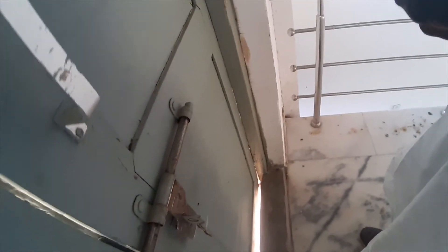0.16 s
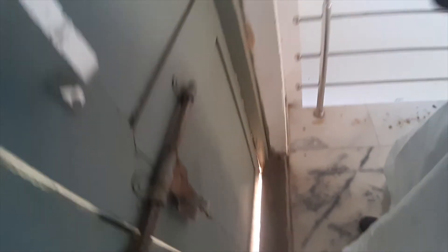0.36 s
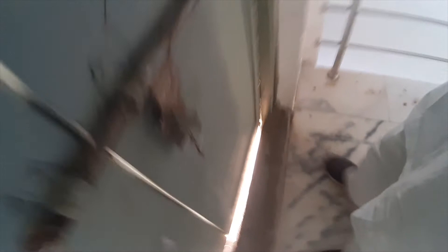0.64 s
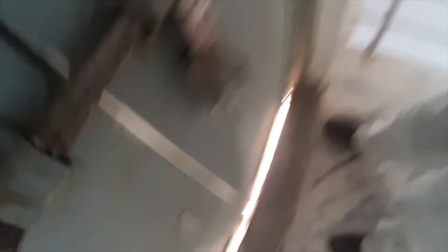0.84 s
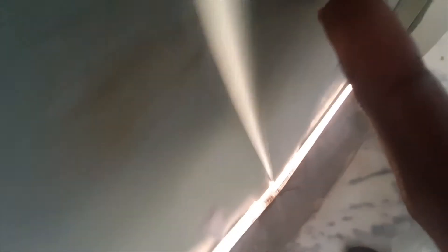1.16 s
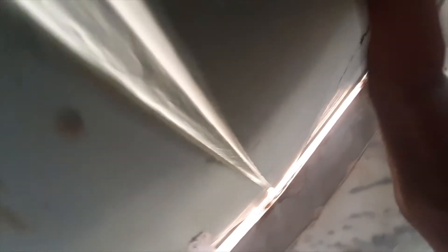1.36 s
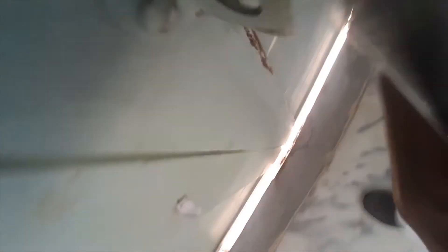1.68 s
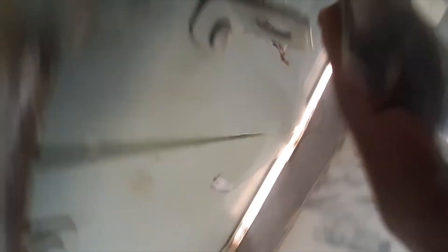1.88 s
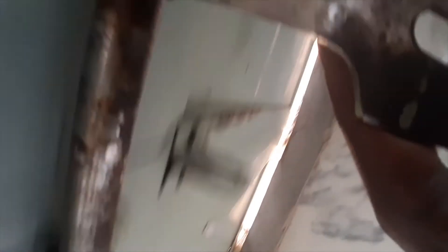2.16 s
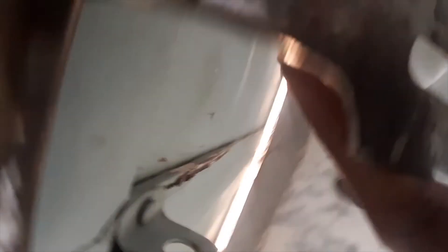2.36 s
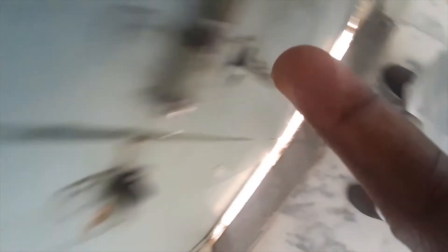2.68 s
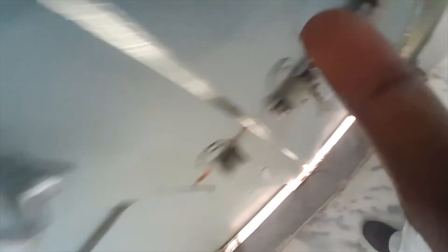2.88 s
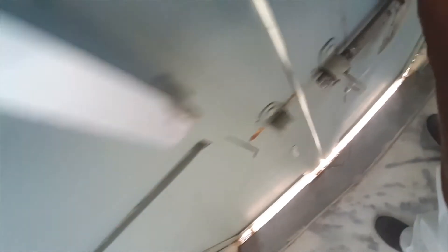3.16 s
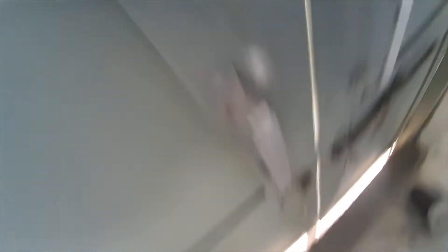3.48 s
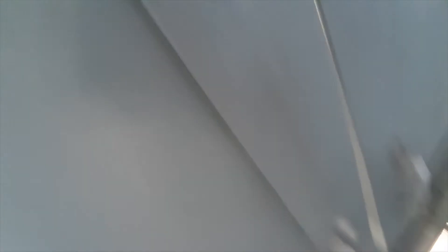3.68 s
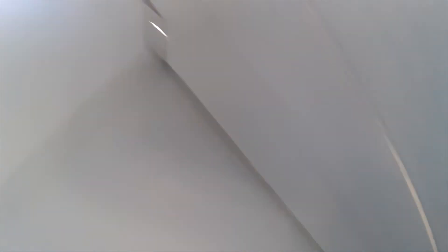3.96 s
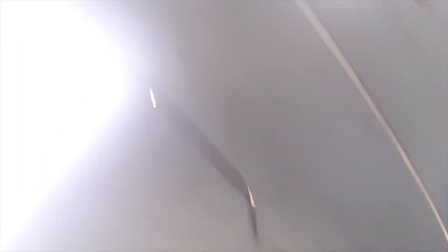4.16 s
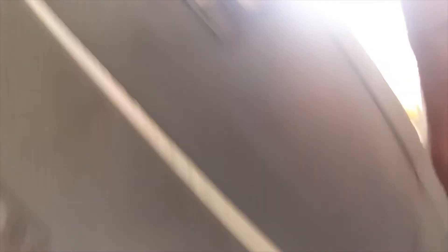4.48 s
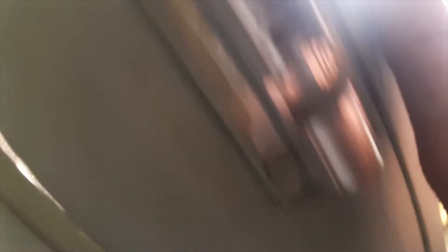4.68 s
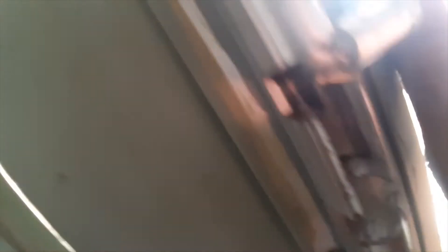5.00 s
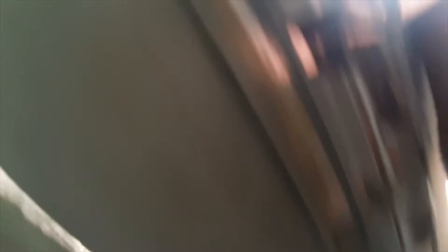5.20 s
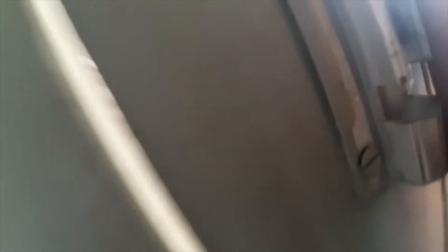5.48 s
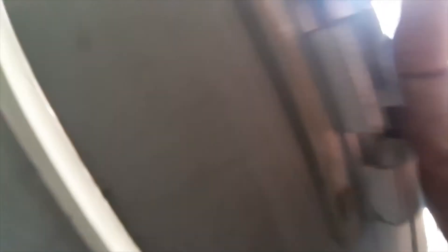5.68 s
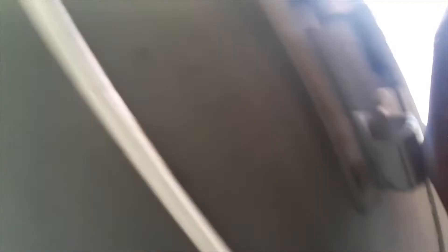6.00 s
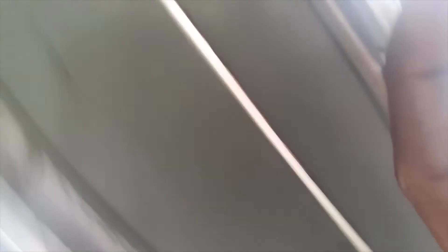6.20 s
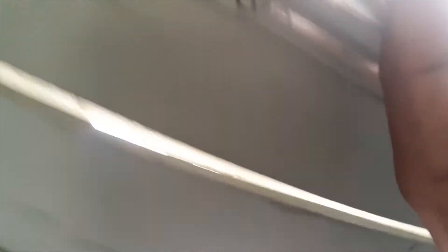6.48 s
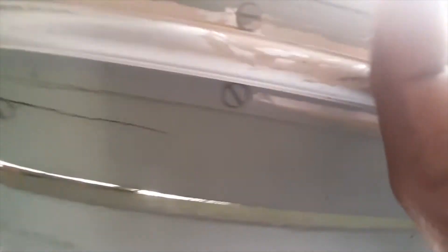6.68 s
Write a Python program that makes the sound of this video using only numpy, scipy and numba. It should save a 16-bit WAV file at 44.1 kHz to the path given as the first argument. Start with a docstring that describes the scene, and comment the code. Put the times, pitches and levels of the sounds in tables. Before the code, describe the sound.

A steel door bolt clicks, scrapes and bangs open twice in an echoing stairwell, amid close hand rustling and a low rumble.

```python
"""A hand works a steel barrel bolt on a sheet-metal door in a stairwell, close to a moving phone.
Over town and handling rumble, cloth and fingers rustle, the bolt clicks and handling thumps twice.
At 2 s the bolt scrapes through its barrel and bangs, and the door leaf booms. A second bang at 2.6 s
leaves loose steel parts ringing thinly. From 3.2 s the rustle returns, with lighter clicks, soft bumps
and a brief high squeak at the end. The stairwell adds a long echo throughout."""
import sys
import numpy as np
from scipy import signal
from scipy.io import wavfile
from scipy.ndimage import uniform_filter1d, map_coordinates
from numba import njit

SR = 44100
rng = np.random.default_rng(int(sys.argv[2]) if len(sys.argv) > 2 else 0)


def persist_wave(psi):
    """Save psi, clipped to +-1, as 16-bit WAV."""
    counts = np.round(np.clip(psi, -1, 1) * 32767).astype(np.int16)
    wavfile.write(sys.argv[1], SR, np.atleast_2d(counts).T)


N = 301644
TIME = np.arange(N) / SR


def undb(db):
    """Decibels to gain."""
    return 10 ** (np.asarray(db) / 20)


def unit(x):
    """Scale to rms 1."""
    return x / np.sqrt(np.mean(x ** 2))


def pan(db):
    """Left and right gains; a pan is left minus right in dB."""
    return undb(np.array([[db], [-db]]) / 2)


def band(x, lo_hz, hi_hz):
    """Band-pass."""
    sos = signal.butter(2, [lo_hz, min(hi_hz, .45 * SR)], "bandpass", fs=SR, output="sos")
    return signal.sosfilt(sos, x)


def ring(x, hz, t60):
    """One mode: an impulse starts a decaying sine."""
    radius, angle = np.exp(-np.log(1000) / (t60 * SR)), 2 * np.pi * hz / SR
    return signal.lfilter([0, np.sin(angle)], [1, -2 * radius * np.cos(angle), radius ** 2], x)


def resonate(x, modes):
    """All modes of one object, driven together."""
    return sum(undb(db) * ring(x, hz, t60) for hz, db, t60 in modes)


def flicker(rate_hz, depth_db):
    """A gain that wanders smoothly at random."""
    hold = int(SR / rate_hz)
    steps = np.repeat(rng.standard_normal(N // hold + 1), hold)
    return undb(depth_db * 1.42 * uniform_filter1d(uniform_filter1d(steps, hold), hold)[:N])


def grit(spread_db, shared):
    """Stereo noise in uneven grains, partly shared by both sides."""
    common, *apart = rng.standard_normal((3, N))
    grains = undb(spread_db * np.repeat(rng.exponential(size=N // 32 + 1), 32)[:N])
    return unit(grains * (np.sqrt(shared) * common + np.sqrt(1 - shared) * np.array(apart)))


def wide_noise(samples, width):
    """Stereo noise, from mono at width 0 to fully wide at 1 and above."""
    mid, side = rng.standard_normal((2, samples))
    return mid + min(width, 1) * side * np.array([[1], [-1]])


# The town's tone. Each row: frequency in Hz, relative noise density in dB.
TOWN_SPECTRUM = [(15, -46), (25, -18), (212, 2.5), (263, -6.5), (405, -6), (1040, -18), (1520, -22),
                 (2550, -36.5), (3920, -33.5), (5280, -102.5), (6380, -42.5), (8590, -51.5), (10100, -61),
                 (12500, -45.5), (16000, -54)]
# The background's ride, in two runs. Each row: time in seconds, level in dB, swell of low handling
# rumble in dB.
RUMBLE_RIDE = [
    [(0.0, -43, 7.5), (0.518, -44.5, 3.5), (1.496, -40.5, 11.5), (1.734, -43, 11), (1.9, -43.5, 9)],
    [(3.3, -45, -1), (3.68, -48, 1), (4.05, -47, 1.5), (4.25, -50.5, 2), (4.49, -48.5, 1),
     (4.66, -46.5, 9.5), (5.06, -48, 8), (5.45, -44, 9.5), (6.14, -44.5, 5), (6.84, -45.5, 0.5)],
]


def background_rumble():
    """Town noise in flickering third-octave bands, with swells of low handling rumble."""
    hz, db = np.transpose(TOWN_SPECTRUM)
    times, level_db, handling_db = np.concatenate(RUMBLE_RIDE).T
    bed, handling_db = 0, np.interp(TIME, times, handling_db)
    for centre in 32 * 2 ** np.arange(0, 9, 1 / 3):
        gain = undb(np.interp(np.log(centre), np.log(hz), db) + handling_db * (centre < 95))
        gain = gain * flicker(6.5, .93)
        noise = wide_noise(N, width=.033 + centre / 1370)  # two close ports hear the same bass
        bed = bed + gain * band(noise, centre / 1.104, centre * 1.121)
    return unit(bed) * undb(np.interp(TIME, times, level_db))


# The stairwell's tail. Each row: frequency in Hz, 60 dB decay in seconds, relative level in dB.
ECHO_BANDS = [(60, 2.45, 3), (256, 1.5, 8), (1000, 1.6, -3.5), (2610, 1.35, -3), (4500, 1.3, -9),
              (7200, 0.95, -11), (12000, 0.14, 7)]


def stairwell(x):
    """A dense echo that builds in a few ms and dies sooner in the treble."""
    hz, t60, db = np.transpose(ECHO_BANDS)
    t, tail = TIME[:SR * 2], 0
    for centre in 45 * 2 ** np.arange(0, 8.5, .5):
        noise = band(wide_noise(len(t), width=centre / 900), centre / 1.22, centre * 1.22)
        level_db, decay_s = (np.interp(np.log(centre), np.log(hz), column) for column in (db, t60))
        tail = tail + noise * undb(level_db - 60 * t / decay_s)
    tail *= 1 - np.exp(-t / .0017)
    tail /= np.sqrt(np.sum(tail ** 2) / 2)
    return signal.fftconvolve(x.mean(axis=0)[None], tail, axes=1)[:, :N]


@njit
def hollow(x, hz, width_hz):
    """The hollow between hand and phone: a band-pass whose centre moves."""
    out, band_state, low_state = np.empty(len(x)), 0., 0.
    for i in range(len(x)):
        tuning, damping = np.tan(np.pi * hz[i] / SR), width_hz / hz[i]
        passed = (band_state + tuning * (x[i] - low_state)) / (1 + tuning * (tuning + damping))
        band_state = 2 * passed - band_state
        low_state += 2 * tuning * passed
        out[i] = damping * passed
    return out


# Two passages of rustle. Each row: time in seconds, level in dB, lows and treble in dB against the
# mids, hollow pitch in Hz, pan of lows and mids in dB, treble pan in dB.
RUSTLE_MOVES = [
    [(0.1, -92, 11, -2, 3790, 8, -9), (0.274, -91, 7, -5, 3850, 13, 1), (0.294, -84, 17, -3, 4000, 12, 4),
     (0.319, -68, 6, -6, 4100, 17, 5), (0.364, -74, -2, -8, 4160, 18, 4), (0.409, -73, 6, -6, 4170, 17, 8),
     (0.434, -63, 6.5, -4, 4000, 25, -7), (0.484, -67, -2, -8, 4130, 16, -7),
     (0.579, -62, 3.5, -5.5, 4400, 13.5, -13), (0.813, -64, -3, -2, 4440, 8, -16),
     (0.878, -61, -7, -4, 4550, 14, -11), (1.182, -76.5, -10, 5, 4900, 10, -19),
     (1.212, -61, 4, -12, 4660, 7, -10), (1.242, -54, 1, -9, 4200, 10, -6),
     (1.317, -86, 12, 6, 3490, 9, -12), (1.337, -80, 13, -1, 3530, 6, -6), (1.352, -88, 9, -5, 3750, 4, -5),
     (1.372, -55, 2.5, -13, 4020, 14, -10), (1.412, -62.5, -1, -8, 4720, 13, -12),
     (1.457, -49, 7, 0, 4130, 14, -9), (1.477, -77, 8, -12, 3970, 5, 0), (1.492, -77, -2, -12, 4050, 3, -2),
     (1.517, -46, -11, -11, 4080, 10, -3), (1.546, -52, 4, -13, 3960, 8, -6),
     (1.636, -65.5, 2, -4, 4200, 13, -10), (1.781, -69, -15, -5, 5030, 15, -7),
     (1.826, -66, -12, -8, 5060, 15, -11), (1.921, -79.5, 1, 3, 4640, 18, -8),
     (1.976, -58, 9, -15, 4420, 15, 7)],
    [(3.198, -79, 15.5, -5, 3200, 0, -9), (3.253, -94, 16, 13, 3300, 4, -17),
     (3.283, -76, -1, 2.5, 3570, 8, -18), (3.357, -77, 8, -2, 4150, 10, -20),
     (3.422, -68.5, -18, -3, 5180, 15, -12), (3.472, -57, 2, -4, 4770, 28, 5),
     (3.482, -68, 15, 16.5, 4760, 22, 13), (3.502, -78, 9, 3.5, 4620, 13, -9),
     (3.517, -67, -7, -2, 4550, -1, -12), (3.582, -60.5, 6.5, -8, 3960, 15, -5),
     (3.622, -65, -6, -4, 4040, 15, -5), (3.647, -62.5, -1, 0, 3600, 11.5, -11),
     (3.806, -53, -8.5, -2.5, 3520, 0, -5), (3.926, -67, 5, -3, 4300, 7, -10),
     (3.976, -44.5, -22, -3.5, 4400, 4.5, -13), (4.011, -45.5, -18, -1.5, 4300, 7, -10),
     (4.21, -64.5, 1.5, -8.5, 3780, 9, -10), (4.425, -72.5, -2.5, -3.5, 3960, 13, -16),
     (4.46, -70.5, 1, -2, 4280, 12, -10), (4.49, -62, -12, -4.5, 4970, 9.5, -11),
     (4.585, -66, -17, -4, 4470, 9, -12), (4.634, -51.5, 1.5, -12.5, 4430, 3.5, -11),
     (4.834, -63.5, -15, -10, 4820, 2.5, -11), (5.024, -59.5, 4, -15, 3990, 4, -15),
     (5.108, -68.5, 5.5, -18, 3530, 8, -4), (5.168, -74, 5, -15, 3400, 12, -1),
     (5.198, -68, 9.5, -21, 3620, 7.5, 0), (5.213, -59.5, 2, -12, 3760, 8, -5),
     (5.258, -57, 3.5, -9, 4400, 0, -5), (5.293, -44, -7, -16, 4300, 6, -11),
     (5.313, -43.5, 2.5, -15, 4340, 0, -6), (5.348, -66, 1, -14, 4290, 0, -2),
     (5.388, -54, -1, -18, 4140, 3, -4), (5.438, -73.5, 14, -19, 3600, 3, 0),
     (5.502, -74, 9, -13, 3530, 10, 4), (5.572, -67, 3, -17, 3950, 15, 3),
     (5.602, -58.5, -1.5, -9, 3960, 22, -8), (5.672, -64.5, -1, -9, 3940, 10, -7),
     (5.722, -49.5, 8, -27, 4040, 5.5, 6), (5.762, -58.5, 2, -20, 3980, 12, 2),
     (5.812, -59, -3, -17, 3900, 16, 3), (5.842, -68, 8, -15, 3570, 10, 0),
     (5.941, -75, 6, -9, 3460, 17, -3), (5.996, -70, 0, -13, 3700, 17, 0),
     (6.021, -55, -5, -10, 4260, 16, -14), (6.046, -54.5, 8, -24, 4000, 7, -2),
     (6.096, -52.5, 4, -12, 3700, 13, -3), (6.136, -74, 8, -2, 3620, 9, -4),
     (6.186, -65.5, -13, -21, 3620, 11, -9), (6.311, -66.5, -17, -9, 3500, 6, -11),
     (6.41, -64, -10, -15, 3620, 3, -22), (6.625, -68, -26, -12, 3700, 6, -16),
     (6.829, -73.5, 2, 3, 3570, 7, -17)],
]


def rustle():
    """Cloth, fingers and soles rub: fine grains in three ranges that flicker apart."""
    rub, out = grit(spread_db=1.3, shared=.16), 0
    low = unit(band(rub, 900, 2400)) * flicker(30, 1.2)
    broad = unit(band(rub, 2100, 7200))
    sheen = .3 * unit(band(rub, 7800, 9500)) + .35 * unit(band(rub, 11000, 13300))
    mid_flicker = flicker(45, 1.2)
    treble = unit(unit(band(rub, 5800, 11000)) + sheen) * flicker(40, 1.2)
    for passage in RUSTLE_MOVES:
        times, db, *curves = np.transpose(passage)
        low_db, treble_db, hz, pan_db, treble_pan_db = (np.interp(TIME, times, c) for c in curves)
        cupped = unit(np.array([hollow(hollow(side, hz, 1200.), hz, 1200.) for side in rub]))
        swish = np.clip(1.2 * undb(.6 * treble_db), .45, .97)  # bright is broad, dull is hollow
        mids = mid_flicker * (swish * broad + np.sqrt(1 - swish ** 2) * cupped)
        body = (mids + undb(low_db) * low) * pan(pan_db)[:, 0]
        top = undb(treble_db) * treble * pan(treble_pan_db)[:, 0]
        out = out + undb(np.interp(TIME, times, db, left=-120, right=-120)) * (body + top)
    return out


# Thin high tones. Each row: start in seconds, level in dB, pitch in Hz, 60 dB decay in seconds, pan in dB.
TING_CUES = [(1.365, -52, 7817, .15, 0), (1.498, -43, 4150, .07, 8), (1.521, -41, 4060, .08, 8),
             (1.56, -49, 7817, .25, 0), (1.56, -58, 11800, .15, 0), (1.565, -53, 4760, .2, 0),
             (1.808, -55, 4760, .15, 0), (1.81, -59, 7817, .1, 0), (1.8, -58, 6200, .12, 0),
             (2.45, -56, 7817, .5, 0), (2.45, -50, 2270, .12, 4), (2.515, -50, 2300, .15, 4),
             (2.6, -58, 5810, .2, 0), (2.65, -46, 4753, .55, -8), (2.75, -68, 7817, 1.0, 0),
             (4.62, -55, 5000, .6, 0), (4.625, -53, 3300, .12, 0), (4.63, -61, 8800, .4, 0),
             (5.305, -49, 2750, .06, 0), (6.8, -53, 9200, .05, -4)]


def tings_and_squeak():
    """Thin rings of loose steel parts, and a brief high squeak at 6.8 s: one jolted mode each."""
    out = np.zeros((2, N))
    for start, db, hz, t60, pan_db in TING_CUES:
        at = int(start * SR)
        jolt = np.pad(rng.standard_normal(256), (0, SR))
        tone = ring(jolt, hz, t60)[:N - at]
        out[:, at:at + len(tone)] += undb(db) * tone / np.abs(tone).max() * pan(pan_db)
    return out


# The door leaf's modes. Each row: pitch in Hz, level in dB, 60 dB decay in seconds.
LEAF_MODES = [(66, -13, .3), (105, -14, .3), (145, 0, .7), (199, -10, .5), (229, -5, .45), (282, -7, .4),
              (343, -5, .35), (390, -7, .3), (528, -13, .2)]
# Door thuds, and low handling thumps at 1.24 and 1.59 s.
# Each row: start in seconds, strength in dB, push length in ms.
THUD_CUES = [(.8645, -26, 0.78), (1.24, -18, 3.9), (1.449, -27, 3.5), (1.59, -17, 3.7), (2.08, -23.5, 0.84),
             (2.122, -21.5, 0.79), (2.144, -14.5, 2.1), (2.249, -4, 2.12), (2.266, -10, 2.24),
             (2.278, -7, 2.64), (2.6403, -8, 1.17), (3.578, -32.5, 1.6), (5.305, -20.5, 3.8),
             (5.77, -28.5, 1.4), (6.06, -27, 3.1)]


def thuds():
    """Door thuds and handling thumps: half-sine pushes, heard directly and through the leaf's modes."""
    push = np.zeros(N)
    for start, db, ms in THUD_CUES:
        at = int(start * SR)
        pulse = np.sin(np.pi * np.linspace(0, 1, int(ms * SR / 1000)))
        push[at:at + len(pulse)] -= undb(db) * pulse / pulse.sum()
    return undb(-16) * resonate(push, LEAF_MODES) + undb(38) * band(push, 129, 640)


# The stiffer plate of leaf round the bolt. Each row: pitch in Hz, level in dB, 60 dB decay in seconds.
PLATE_MODES = [(636, -16, 0.15), (720, -5, .07), (870, -0.5, 0.02), (1002, -14.5, 0.08),
               (1309, -6.5, 0.053), (1491, 0, 0.029), (1643, -9, 0.054), (2020, -19, 0.079),
               (2353, -13, 0.08), (2766, -9, .03)]
# Steel on steel. Each row: start in seconds, level in dB, knock and treble in dB against the crack,
# ring pitch in Hz, ring gain, chatter decay in ms, pan in dB.
CLICK_CUES = [(0.336, -46, -4, -10, 4240, 0.072, 1.5, 22), (0.5535, -39.5, -6, -19, 4060, 0.07, 1.1, 15),
              (0.6453, -39, -4, -5, 3940, 0.036, 1.3, 21.5), (0.7162, -37.5, -1, -18, 2730, 0.15, 1, 27),
              (0.776, -49, -0.5, -15, 6460, 0.06, 2.5, 22), (0.8638, -26, -12, -14, 6100, 0.053, 3.9, 4),
              (0.9142, -36, -11, -9, 6360, 0.084, 6.9, -3), (1.2011, -41.5, -4, -9, 4080, 0.06, 2.8, 4),
              (1.3737, -35, -12, -18, 7620, 0.11, 2.7, 1), (1.447, -20.5, -3.5, -12, 3980, 0.18, 2.3, 15.5),
              (1.4534, -25.5, -6, -6, 4070, 0.06, 2.2, 2.5), (1.5198, -36, -4, -16, 4120, 0.055, 5.1, 17),
              (1.5603, -26.5, -2.5, -11, 5800, 0.18, 5.5, 11),
              (1.6731, -41.5, -6, -13, 6200, 0.06, 2.5, 15), (2.101, -14, -13, -7, 4120, 0.038, 6.3, 12),
              (2.1205, -10.5, -40, -17, 3030, 0.042, 4.4, 12.5),
              (2.2477, -22, -1, -10.5, 4500, 0.032, 2.4, 35.5),
              (2.2604, -22, -26, -26, 2900, 0.06, 1.4, 26), (2.2744, -29.5, -3, -24, 4130, 0.088, 2.1, 26),
              (2.4522, -38.5, -30, -4, 2650, 0.071, 2.9, 5.5),
              (2.5146, -46.5, -21, -12, 3140, 0.13, 2.7, 24), (2.6388, -12.5, 7, -7, 2600, 0.12, 2.6, 5),
              (2.6439, -7, -6.5, -12.5, 2900, 0.17, 1.4, 1), (2.7084, -43, 2, -11, 4760, 0.06, 2.5, 14),
              (2.9582, -43, -25, -8, 2660, 0.066, 1.3, 10), (3.3781, -39.5, -5, -22, 4270, 0.06, 1.4, 21.5),
              (3.4145, -34.5, -17, -2, 8500, 0.18, 1.9, 12), (3.5772, -43.5, -14, -15, 4140, 0.06, 2, 22),
              (3.6375, -49, 5, -13, 4110, 0.051, 5.5, -8), (3.8816, -44, -18.5, -7, 2880, 0.055, 3.6, 1),
              (4.6153, -34.5, -2.5, -19, 5100, 0.095, 6.9, 2),
              (5.2748, -32.5, -7, -18, 4400, 0.091, 2.9, -1.5),
              (5.2998, -30.5, -8, -9, 4150, 0.083, 2.1, -5), (5.3644, -44, -5, -13, 4300, 0.06, 2.8, 10),
              (5.7198, -43, 2, -19, 4000, 0.14, 1.7, 13), (5.7702, -45, 9, -13, 4710, 0.069, 1.9, 17),
              (5.7991, -34, 7.5, -13, 3920, 0.036, 1.4, 19.5), (6.0344, -37, 3, -13, 3700, 0.06, 2.9, 8.0),
              (6.0544, -39, 8, -13, 3680, 0.06, 4.6, 9), (6.0855, -35.5, 3.5, -9, 3800, 0.13, 2.8, -1),
              (6.0974, -44, -5, -13, 3520, 0.074, 3.1, 2.0)]


def bolt_clicks():
    """Each click snaps 1.5 ms after its start, then chatters: a crack, a ring, a knock into the plate."""
    length = 4096
    direct, push = np.zeros((2, 2, N + length))
    t = np.arange(length) / SR - .0015  # seconds from the snap
    snap = -1.52 * np.exp(-(t / .00006) ** 2)
    shiver = .096 * np.exp(-t / .018)  # the sheet shivers on
    for start, db, knock_db, treble_db, ring_hz, ring_gain, chatter_ms, pan_db in CLICK_CUES:
        span = slice(int(start * SR), int(start * SR) + length)
        common, *apart = rng.standard_normal((3, length))
        envelope = np.where(t < 0, np.exp(t / .00017), np.exp(-t * 1000 / chatter_ms) + shiver)
        contact = (1.42 * common + 1.34 * np.array(apart)) * envelope + snap
        crack = band(band(contact, 1200, 7900), 1100, 5100) + ring_gain * ring(contact, ring_hz, .007)
        treble, knock = band(contact, 6500, 13000), band(contact, 600, 2410)
        crack, treble, knock = (undb(db) * x / np.abs(x).max() for x in (crack, treble, knock))
        # the treble finds the right port more easily
        direct[:, span] += crack * pan(pan_db) + undb(treble_db) * treble * pan(pan_db - 7)
        push[:, span] += undb(knock_db) * knock * pan(.26 * pan_db)
    return (direct + 1.42 * push + undb(-24) * resonate(push, PLATE_MODES))[:, :N]


# The barrel's resonances. Each row: centre in Hz, width in Hz, relative level in dB.
BARREL_BANDS = [(1600, 250, -3), (2300, 250, -1), (2800, 300, 0), (3650, 250, 2), (4250, 300, 0),
                (5000, 300, -2), (5900, 300, 1), (6400, 250, 0), (11300, 900, -14)]
# The bolt's drag. Each row: time in seconds, level in dB, leaf rumble in dB against the scrape.
SCRAPE_RIDE = [(1.95, -63, 2), (1.99, -47, 6), (2.02, -38, 0), (2.06, -36.5, 4.5), (2.09, -31.5, -0.5),
               (2.13, -34.5, 14.5), (2.16, -39, 12), (2.2, -37.5, 7.5), (2.24, -36, 6.5), (2.28, -50.5, 29),
               (2.31, -69, 13)]


def bolt_scrape():
    """Gritty friction wakes the barrel's resonances by turns and shakes the leaf."""
    times, db, rumble_db = np.transpose(SCRAPE_RIDE)
    drag = grit(spread_db=2.2, shared=.4) * flicker(120, 1)
    barrel = sum(undb(band_db) * flicker(50, 4) * unit(band(drag, hz - width / 2, hz + width / 2))
                 for hz, width, band_db in BARREL_BANDS)
    rasp = unit(band(band(drag, 1700, 5300), 1300, 5800))
    scrape = unit(unit(barrel) + undb(-.5) * rasp) * pan(9.4)
    hiss = undb(-14) * unit(band(drag, 9630, 17300)) * pan(-2)
    leaf = unit(resonate(drag.mean(axis=0), LEAF_MODES[1:] + PLATE_MODES))
    rumble = unit(leaf + .86 * unit(band(drag, 200, 1140))) * undb(np.interp(TIME, times, rumble_db))
    return undb(np.interp(TIME, times, db, left=-120, right=-120)) * (scrape + hiss + rumble)


# The phone turns in the hand. Each row: time in seconds, lag of the left port behind the right in ms.
PORT_LAG = [(0, 0.042), (.75, 0.21), (1.25, -0.17), (2.25, -0.27), (2.6, 0.095), (3.75, 0.35), (4.5, 0.33),
            (5.25, 0.29), (5.75, -0.17), (6.84, -0.29)]


def scene():
    """Near sounds, their echo and the rumble reach one microphone port just before the other."""
    near = bolt_clicks() + thuds() + tings_and_squeak() + bolt_scrape() + rustle()
    left, right = near + undb(-15.5) * stairwell(near) + background_rumble()
    lag = np.interp(TIME, *np.transpose(PORT_LAG)) * SR / 1000
    return np.array([map_coordinates(left, [np.arange(N) - lag / 2]),
                     map_coordinates(right, [np.arange(N) + lag / 2])])


def record(dry):
    """The phone drops the deepest bass, rounds the loudest peaks and cuts the top."""
    low_cut = signal.butter(6, 47, "highpass", fs=SR, output="sos")
    high_cut = signal.ellip(10, .2, 70, 16000, fs=SR, output="sos")
    return signal.sosfilt(high_cut, np.tanh(signal.sosfilt(low_cut, dry)))


dry = scene()
out = record(dry)
persist_wave(out)
```